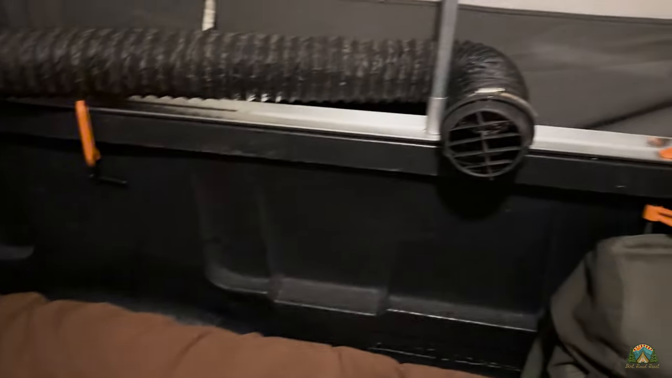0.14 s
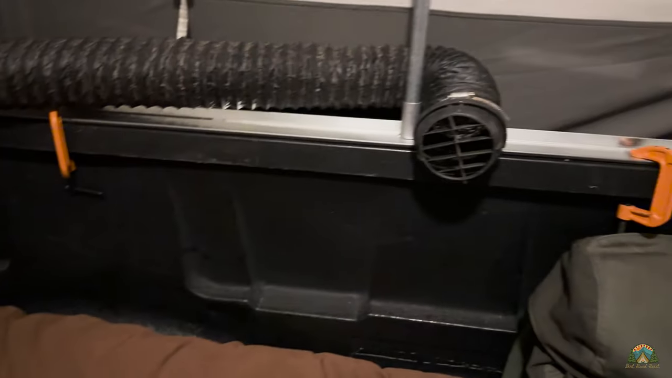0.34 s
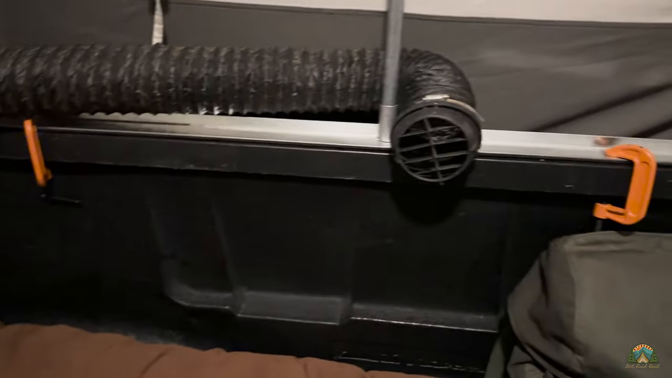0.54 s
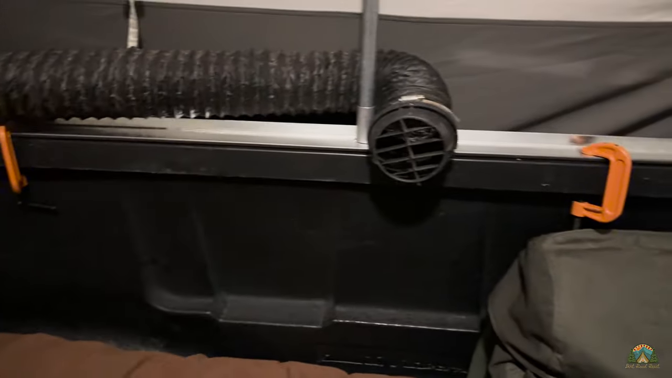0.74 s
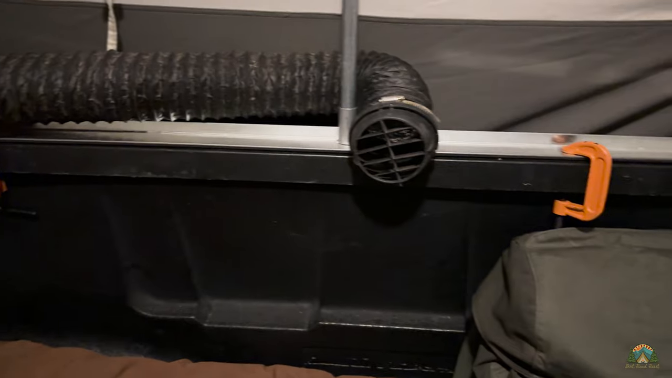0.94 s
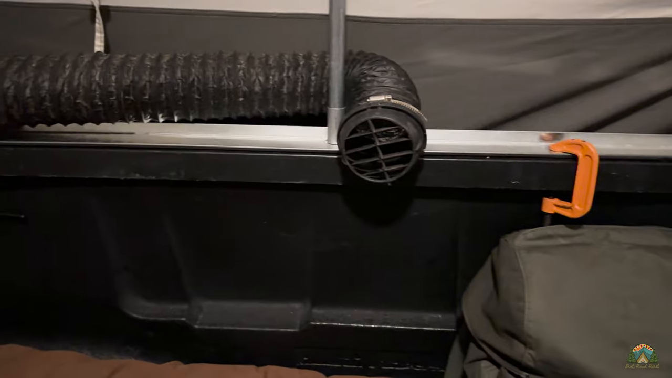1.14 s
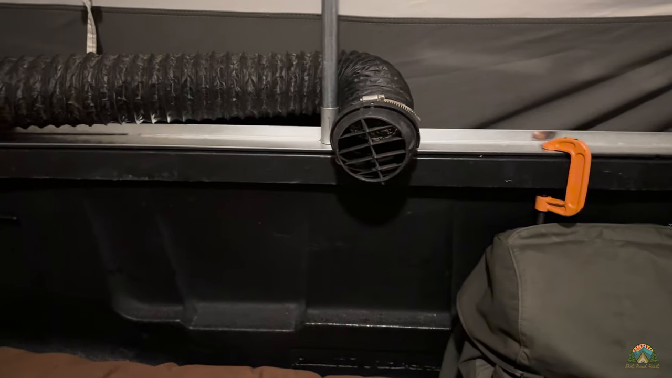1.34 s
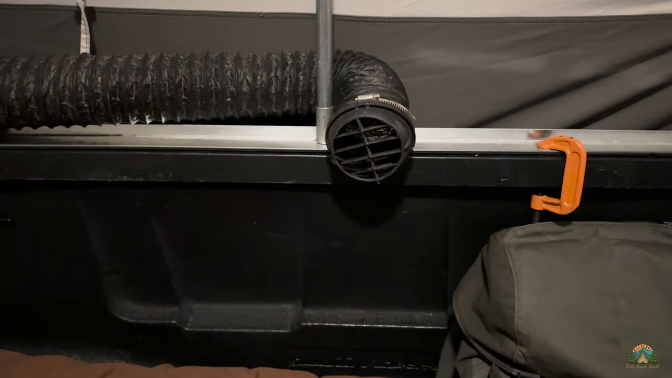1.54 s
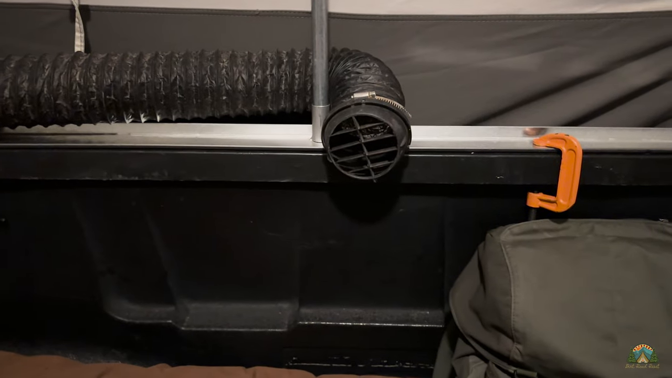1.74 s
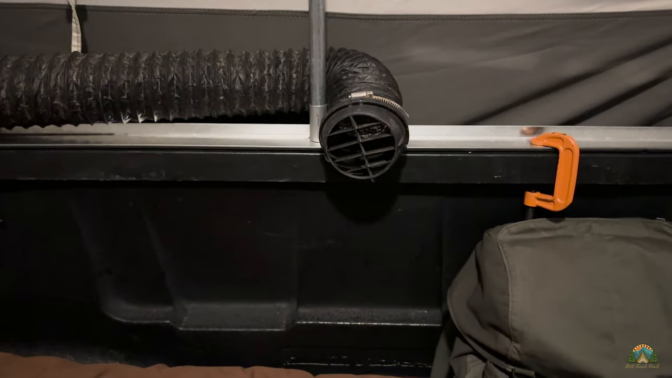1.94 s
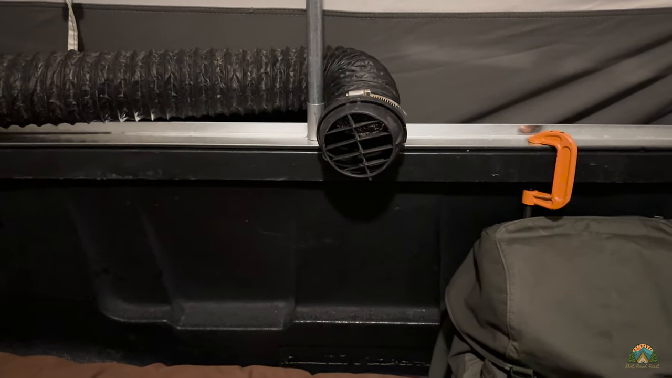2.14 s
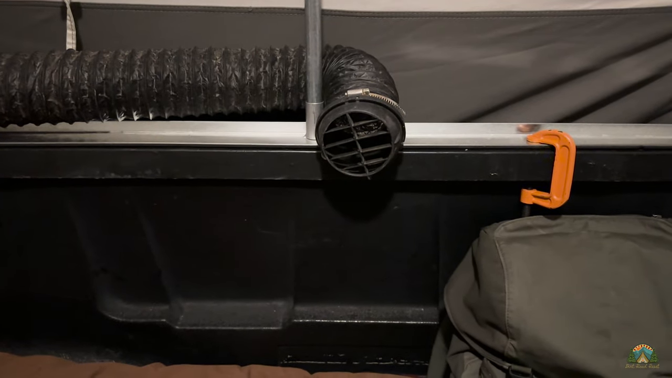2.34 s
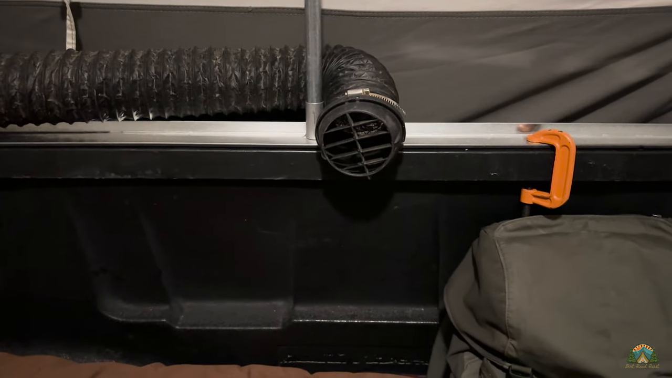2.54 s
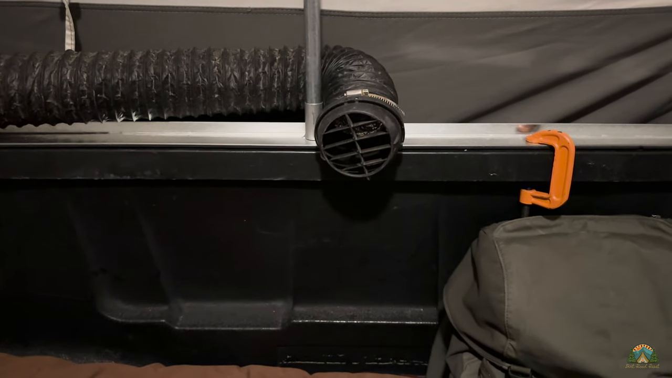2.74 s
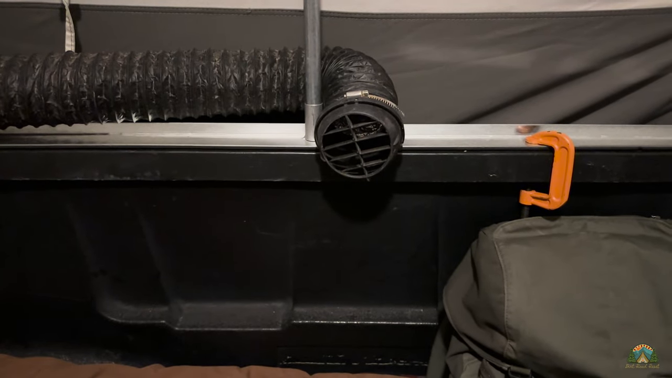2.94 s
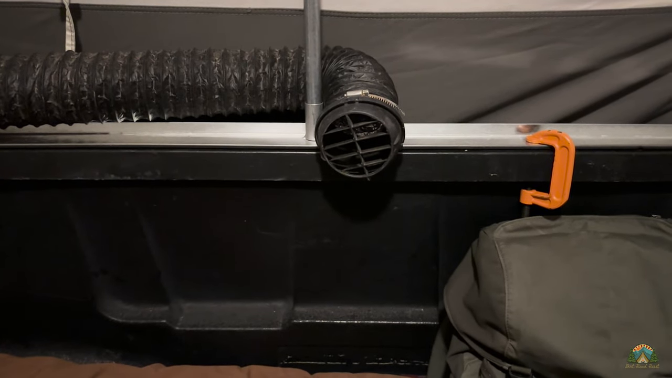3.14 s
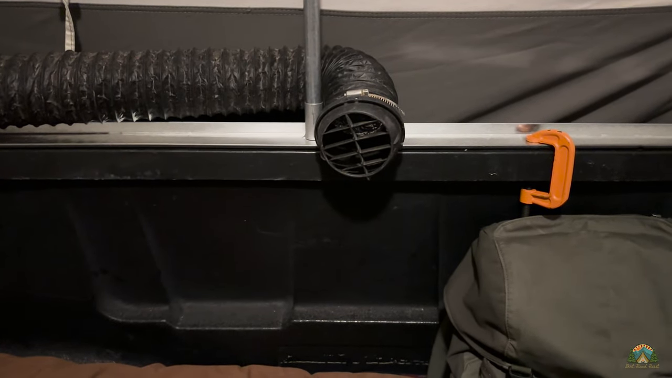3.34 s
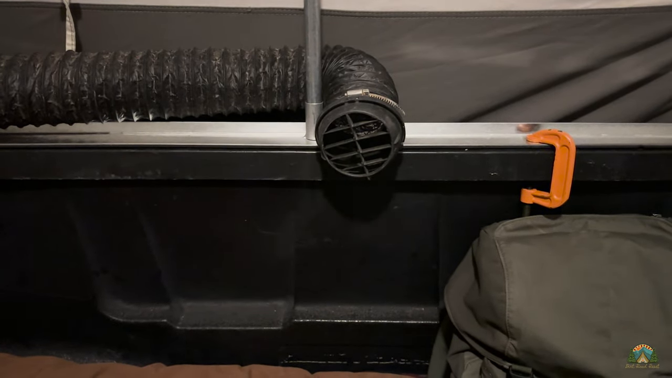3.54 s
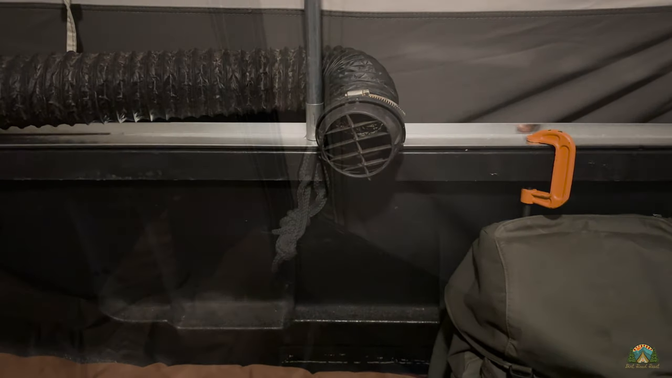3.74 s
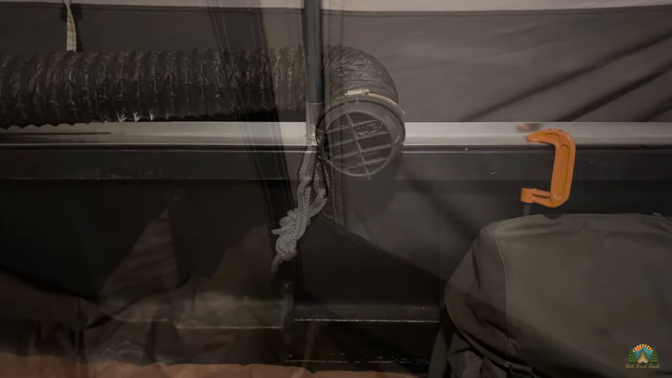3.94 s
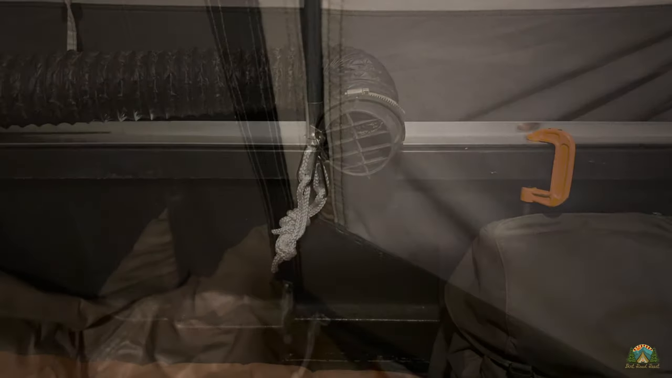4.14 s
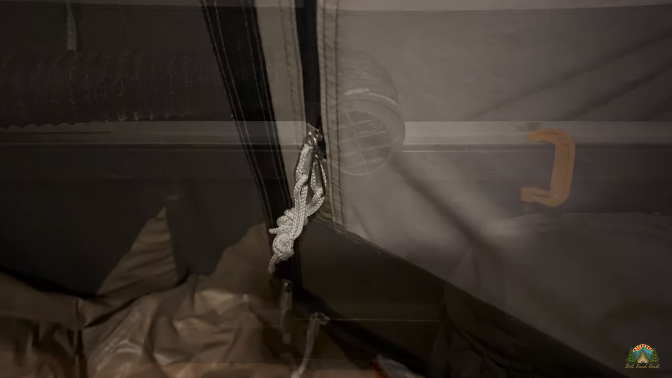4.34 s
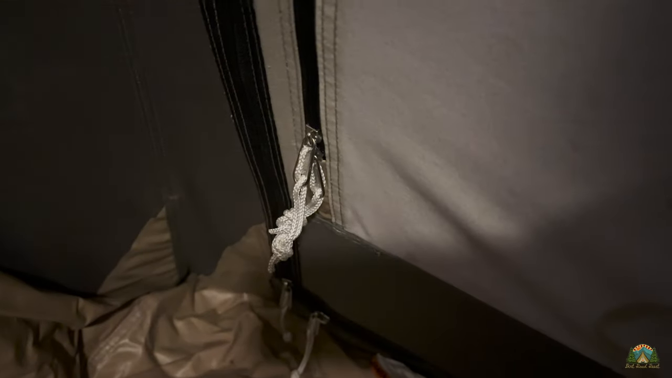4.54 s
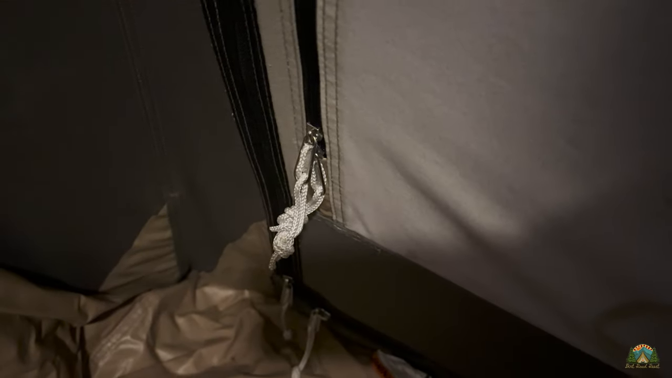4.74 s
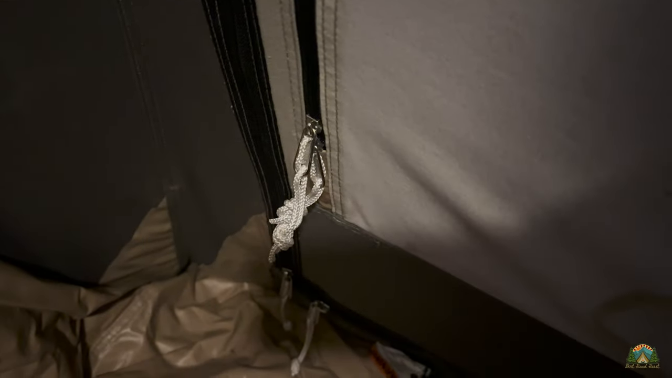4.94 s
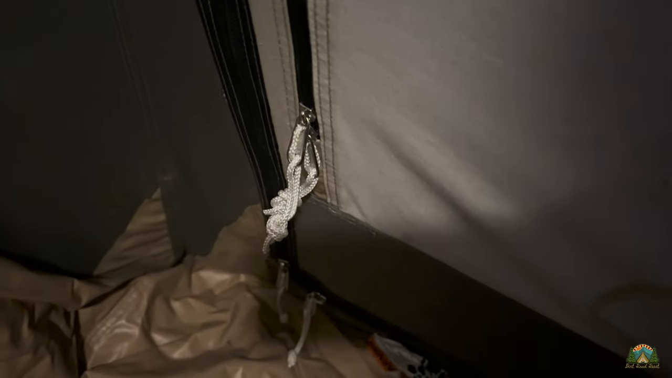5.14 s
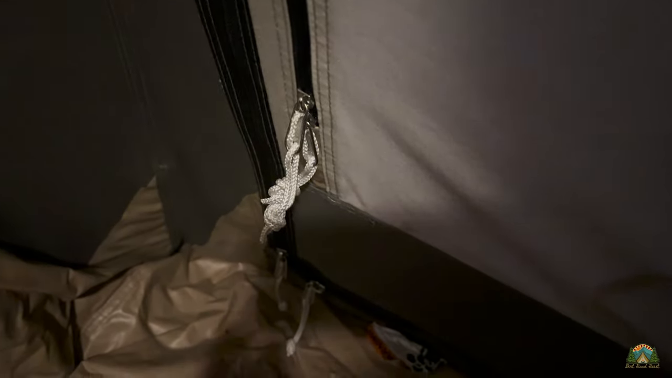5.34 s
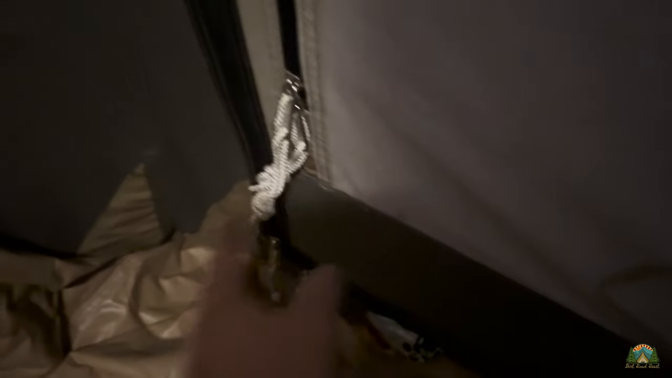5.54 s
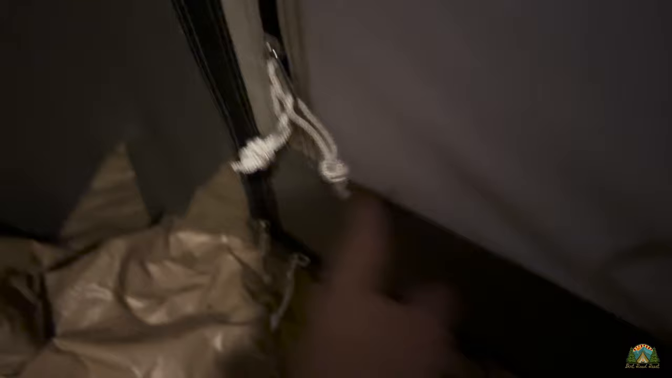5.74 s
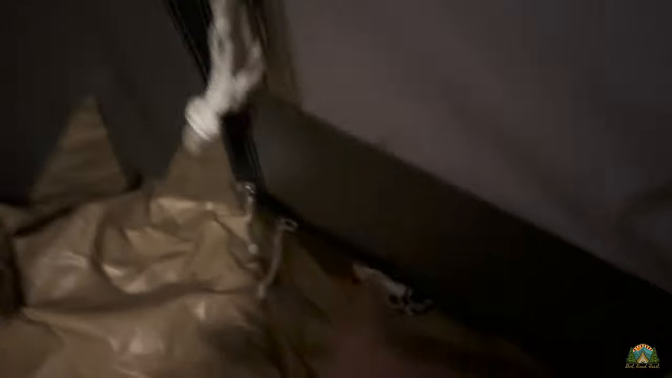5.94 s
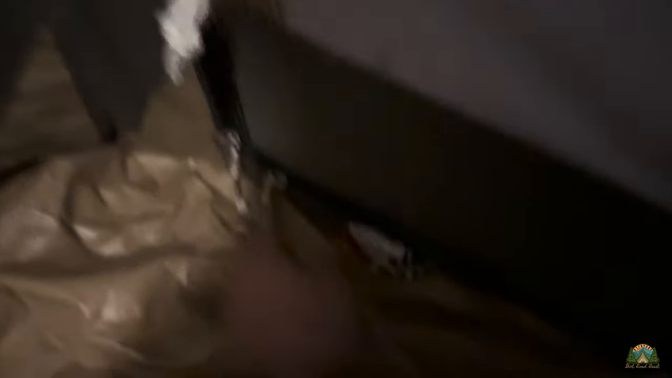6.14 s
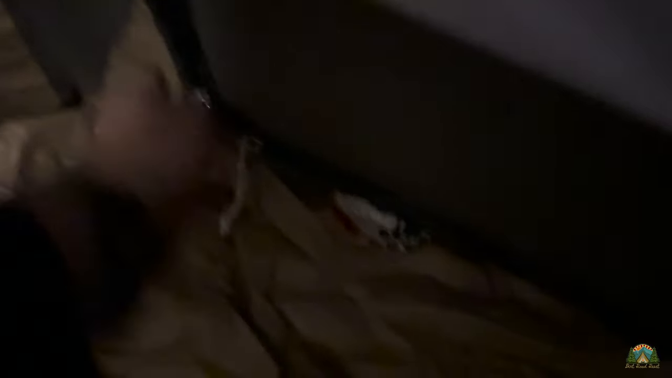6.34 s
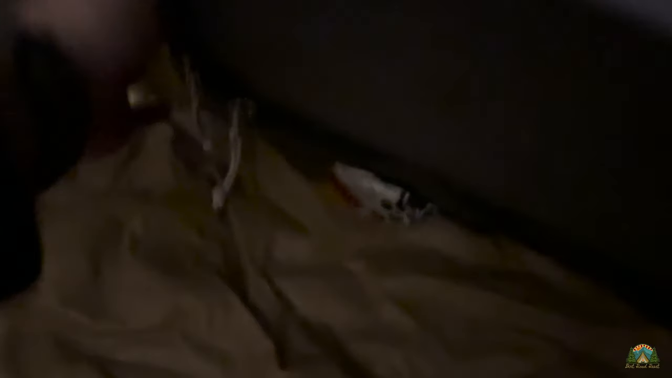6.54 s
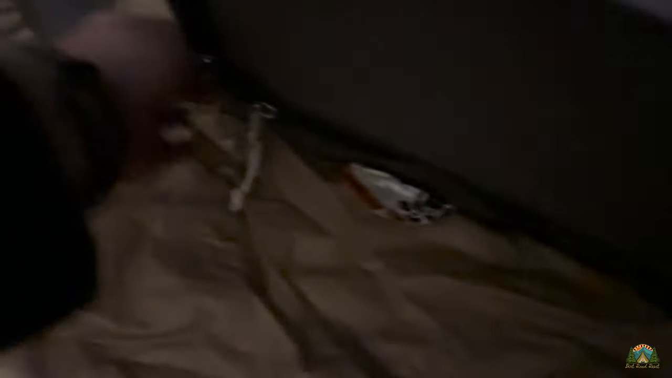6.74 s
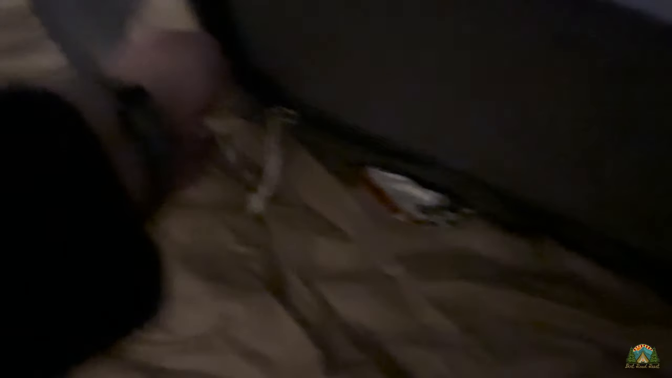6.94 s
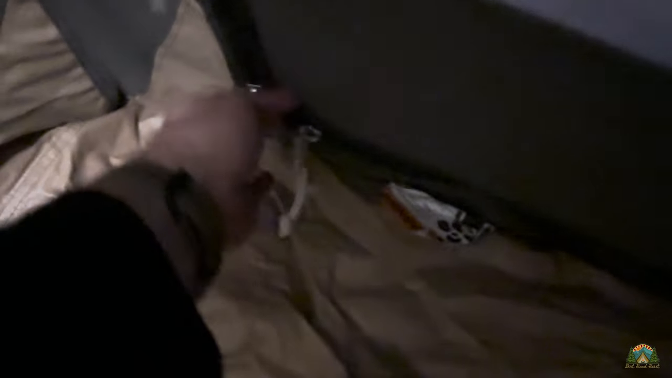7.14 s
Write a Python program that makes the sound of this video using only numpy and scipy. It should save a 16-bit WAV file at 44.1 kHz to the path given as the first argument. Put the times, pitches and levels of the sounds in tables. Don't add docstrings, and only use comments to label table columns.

```python
import sys
import numpy as np
from scipy import signal
from scipy.fft import rfft, irfft, next_fast_len
from scipy.io import wavfile
from scipy.ndimage import map_coordinates

SR = 44100
rng = np.random.default_rng(int(sys.argv[2]) if len(sys.argv) > 2 else 0)


def invert_db(level):
    return 10 ** (np.asarray(level, dtype=float) / 20)


def int16_out(signal):
    q = np.round(np.clip(np.atleast_2d(signal).T, -1, 1) * 32767)
    wavfile.write(sys.argv[1], SR, q.astype(np.int16))


N = 321048
CUT = 4.0641
DIRECT = np.array([[1], [0]])


def unit(x):
    return x / np.sqrt(np.mean(x ** 2) + 1e-20)


def along(points, hz):
    f, v = np.transpose(points)
    return np.interp(np.log(hz + 1), np.log(f + 1), v)


def wobble(rate):
    steps = np.arange(0, N + 32, 32)
    knots = rng.standard_normal(int(N * rate / SR) + 4)
    return np.interp(np.arange(N), steps, map_coordinates(knots, [steps * rate / SR]))


def filtered(x, response):
    m = next_fast_len(x.shape[-1] + 8192)
    return irfft(rfft(x, m) * response(np.fft.rfftfreq(m, 1 / SR)), m)[..., :x.shape[-1]]


def rush(gain, grains=1):
    return unit(filtered(grains * rng.standard_normal((2, N)), gain))


def colour(spectrum):
    return lambda hz: invert_db(along(spectrum, hz))


def swells(t, start, end, db, rise, fall):
    return invert_db(db - rise * np.clip(start - t, 0, None) - fall * np.clip(t - end, 0, None))


def ringing(rows, t60):
    out, t = np.zeros((2, N + SR)), np.arange(SR // 8) / SR
    for s, db, hz in rows:
        pair = np.sin(2 * np.pi * hz * t)
        pair += 0.6 * np.sin(2 * np.pi * 1.03 * hz * t + 6 * rng.random())
        soft_start = (1 - np.exp(-t / 0.00045)) ** 2
        out[0, round(s * SR):][:len(t)] += invert_db(db - 60 * t / t60) * soft_start * pair
    return out[:, :N]


def clicks(rows, life, size, order=1):
    s, db, hz = np.transpose(rows)[..., None]
    k = np.arange(size)
    cycles = k * hz / SR
    shape = (cycles / life * np.exp(1 - cycles / life)) ** order
    note = invert_db(db) * np.sin(2 * np.pi * cycles) * shape
    at = np.round(s * SR).astype(int)
    return np.bincount((at + k).ravel(), note.ravel(), N + size)[:N]


# t/s, left minus right level/dB
HAND = [
    (4.0, -2),
    (5.0, 1),
    (6.2, 1.5),
    (6.75, -1),
    (7.1, 8),
    (7.28, 6),
]


def cracks(events, low_hz, mid_hz, high_hz, slip, tent_db):
    out = np.zeros((2, N + SR))
    t = np.clip(np.arange(-128, 3968), 0, None) / SR
    for s, db, low_db, high_db, t60 in events:
        pan_db = np.interp(s, *np.transpose(HAND))
        fade = invert_db(-60 * np.clip(t - slip, 0, 1) / max(t60, 0.005))
        fade += invert_db(tent_db - 60 * t / 0.16)
        burst = rng.standard_normal((2, len(t))) * fade * (1 - np.exp(-t / 0.00056))
        lumps = 2 * rng.standard_normal(40)
        shape = [(low_hz / 3, low_db + 12), (low_hz, low_db + 5.5), (0.7 * mid_hz, 0),
                 (mid_hz, 0.22 * high_db + 1.5), (high_hz, high_db + 1),
                 (2 * high_hz, high_db - 12.5), (3 * high_hz, high_db - 46)]

        def fold(hz):
            bumpy_db = along(shape, hz) + np.interp(hz, np.arange(40) * 420, lumps)
            return invert_db(bumpy_db) / (1 + (200 / (hz + 1)) ** 4)

        burst = filtered(burst, fold)
        burst[1] += np.clip(pan_db / 12, -0.8, 0.8) * burst[0]
        out[:, round(s * SR) - 128:][:, :len(t)] += invert_db(db) * burst
    return out[:, :N]


# t/s of the peak, build-up/s, level/dB
GRIP = [
    (5.8, 0.079, -45),
    (6.28, 0.12, -37),
    (6.75, .12, -46),
    (7.22, 0.19, -38),
]


def burn():
    t = np.arange(N) / SR
    flame = invert_db(np.where(t < CUT, -43.5, -40) + 1.24 * wobble(4.94))
    let_go_s = 0.049
    grip = sum(swells(t, s, s, db, 10 / build, 10 / let_go_s) ** 2 for s, build, db in GRIP)
    return np.sqrt(flame ** 2 + grip)


def blower(roar, air, duct, air_db, duct_db):
    def pipes(hz):
        return np.sqrt(sum(invert_db(db) ** 2 / (1 + (2 * (hz - centre) / width) ** 4)
                           for centre, width, db in duct))

    whistle = invert_db(duct_db + 2.2 * wobble(6)) * rush(pipes)
    blown = invert_db(air_db + 1.1 * wobble(2.1)) * rush(colour(air))
    return rush(colour(roar)), blown + whistle


# f/Hz, level/dB per Hz
ROAR_1 = [(13, -67.5), (22, -38), (45, -7), (85, -8), (118, 1), (138, -3.5), (162, -12.5), (199, 0.5),
          (238, -13.5), (372, -14.5), (457, -23), (572, -22), (629, -32.5), (1000, -42), (1300, -70),
          (2200, -120)]
ROAR_2 = [(13, -69), (22, -49), (40, -13.5), (75, -3.5), (112, 2), (145, -3.5), (192, 1.5), (261, -5.5),
          (338, -13.5), (436, -14), (503, -17), (554, -31), (600, -24.5), (775, -41.5), (1000, -48.5),
          (1300, -74.5), (2200, -120)]
# f/Hz, level/dB
AIR_1 = [(410, -36), (700, -15.5), (998, -8), (1130, -7), (1750, -16), (2130, -4.5), (2440, -21),
         (4710, -33), (7140, -30.5), (13000, -51.5)]
AIR_2 = [(410, -47), (700, -17.5), (999, -13.5), (1310, -6), (1610, -16.5), (1930, -12.5), (2380, -24.5),
         (2690, -21.5), (3880, -34.5), (10000, -42), (13000, -71), (22000, -120)]
# f/Hz, width/Hz, level/dB
DUCT_1 = [(1083, 9, -5.5), (1194, 27, -7.5), (1299, 53, -8), (1594, 64, -13.5), (1890, 27, -8),
          (2133, 33, -5), (2636, 67, -24.5), (3340, 90, -30)]
DUCT_2 = [(1290, 85, -3), (1680, 30, -20), (1935, 63, -12), (2210, 32, -13), (2584, 82, -22),
          (3304, 50, -26)]


def heater():
    t = np.arange(N) / SR
    roar_1, air_1 = blower(ROAR_1, AIR_1, DUCT_1, air_db=-72.5, duct_db=-71)
    roar_2, air_2 = blower(ROAR_2, AIR_2, DUCT_2, air_db=-67, duct_db=-65)
    near_cut = np.clip(np.abs(t - CUT) / 0.0038, 0, 1)
    roar = burn() * near_cut * np.where(t < CUT, roar_1, roar_2)
    bump = np.cos(np.pi / 2 * np.clip((CUT - 0.001 - t) / 0.0057, -1, 1)) ** 2
    crest = invert_db(-35.5) * (t < CUT) * bump
    crest = filtered(crest, lambda hz: 1 / (1 + (hz / 13000) ** 20))
    blades = invert_db(-70.5 + 0.79 * wobble(8.4)) * np.sin(2 * np.pi * 1120 * t + 3 * wobble(2.7))
    return roar + np.where(t < CUT, air_1, air_2) + (crest + blades) * DIRECT


# t/s, level/dB, f/Hz
TICKS = [(0.0033, -65, 8100), (.079, -64.5, 8500), (.2046, -55, 4100), (1.0942, -45, 1000),
         (.205, -46, 1000), (1.0939, -56, 3700), (6.718, -44, 10600), (6.759, -48, 10500),
         (5.03, -54.5, 5000), (6.36, -37, 5420), (6.757, -42, 5700), (6, -39, 9200), (6.98, -43, 14000),
         (6.6, -44, 6400), (7.197, -41, 1980)]


def ticks():
    return ringing(TICKS, t60=0.021)


# t/s, peak level/dB, f/Hz
RAPS = [(0.2045, -36, 1900), (0.2047, -46, 3900), (0.3438, -43, 1700), (0.344, -47, 800),
        (1.0903, -48, 1500), (1.0938, -38, 2200), (1.094, -46, 3800), (1.0938, -42, 950),
        (1.1904, -34, 2000), (1.191, -42, 800)]
# t/s, peak level/dB, low level/dB, high level/dB
TAPS = [
    (0.2075, -47.5, 5, -32),
    (0.346, -54, 7, -51),
    (1.0967, -47.5, 0.5, -32),
    (1.1933, -47.5, -0.5, -40),
    (5.027, -57, -10, -15),
    (5.2292, -61.5, 9, 1.5),
    (5.33, -47, -4, -35),
]


def frame_taps():
    bodies = cracks([(*row, 0.031) for row in TAPS], low_hz=900, mid_hz=3600, high_hz=6050,
                    slip=0.0011, tent_db=-6.5)
    return bodies + clicks(RAPS, life=0.8, size=256, order=3) * DIRECT


# t/s, peak level/dB, f/Hz
CHIPS = [(0.3345, -71.5, 7730), (0.6619, -71, 7600), (0.7483, -66, 7450), (1.6511, -82, 7800),
         (1.7419, -78, 7600), (2.2403, -89, 7560), (2.3394, -92, 7500), (2.6489, -89, 7650),
         (2.8809, -89, 7030), (3.0904, -79, 7600), (3.5294, -83, 7190), (3.6366, -80, 7430)]


def birds():
    out, t = np.zeros((2, N + SR)), np.arange(SR // 20) / SR
    for s, db, hz in CHIPS:
        puff = rng.standard_normal((2, len(t))) * np.sin(np.pi * np.clip(t / 0.028, 0, 1)) ** 0.6
        note = filtered(puff, lambda f: 1 / (1 + ((f - hz) / 260) ** 4))
        out[:, round(s * SR):][:, :len(t)] += invert_db(db - 13.5) * unit(note)
    return out[:, :N]


PUMP_STARTS = [
    .361,
    4.688,
]
# t/s, peak level/dB, f/Hz
PUMP_EXTRA = [
    (4.082, -51, 618),
    (4.386, -48, 617),
]


def pump_strokes():
    period_s = 0.4341
    times = np.concatenate([s + period_s * np.arange(count) for s, count in zip(PUMP_STARTS, (9, 6))])
    chance = rng.standard_normal((len(times), 2))
    steady = [(s, -45 + 1.2 * a - 3 * (s > CUT), 562.4 + 12 * b) for s, (a, b) in zip(times, chance)]
    return steady + list(PUMP_EXTRA)


def pump():
    out, t = np.zeros((2, N + SR)), np.arange(SR // 4) / SR
    for s, db, hz in pump_strokes():
        ring = invert_db(-60 * t / 0.11) * (1 - np.exp(-t / 0.001)) * np.sin(2 * np.pi * hz * t)
        ring += 0.28 * invert_db(-60 * t / 0.072) * np.sin(2 * np.pi * 1.3 * hz * t)
        out[0, round(s * SR):][:len(t)] += invert_db(db) * ring
        out[0, round((s + 0.04) * SR):][:len(t)] += invert_db(db - 6.5) * ring
    return out[:, :N]


def stroke(t, s, hold, db):
    rise = 460
    rub = swells(t, s, s + hold, db, rise, 290)
    settling = swells(t, s, s + hold, db - 9.5, rise, 83)
    return rub ** 2 + settling ** 2


def fibres(level_db, count):
    when, pitch, size, side = rng.random((count, 4)).T[..., None]
    at = (SR * (4.85 + 2.4 * when)).astype(int)
    hz = 700 * invert_db(20 * pitch)
    k = np.arange(256)
    cycles = k * hz / SR
    level = invert_db(level_db[at] - 5.1 * np.log(size + 0.032))
    grain = level * np.sin(2 * np.pi * cycles) * cycles * np.exp(-cycles / 2.06)
    return np.array([np.bincount((at + k).ravel(), (grain * share).ravel(), N + 256)[:N]
                     for share in (1, 2 * side - 1)])


# t/s, hold/s, level/dB
STROKES = [(4.897, 0.037, -67), (5.127, 0.033, -61), (5.313, 0.081, -61.5), (5.48, 0.22, -59.5),
           (5.755, 0.1, -57.5), (5.928, .24, -54.5), (6.217, 0.19, -60), (6.44, 0.17, -67),
           (6.623, 0.041, -60), (6.895, .09, -65), (7.02, 0.092, -59), (7.162, 0.037, -54),
           (7.265, .02, -72)]
# t/s, level/dB
STRAIN = [
    (4.85, -75.5),
    (5.4, -72.5),
    (6.05, -57.5),
    (6.57, -55.5),
    (6.7, -56.5),
    (6.8, -64),
    (6.96, -68),
    (7.05, -59),
    (7.28, -66),
]
# f/Hz, level/dB
CANVAS = [(1200, -19), (2200, 3.5), (3500, 3), (5000, -1), (6500, 0.5), (8500, -2), (10000, -28),
          (12000, -33)]
TARP = [(7000, -10), (9500, -5.5), (11000, -3.5), (13000, -1.5), (15600, 2), (16000, -5), (16500, -74)]
FOLD = [(250, -23), (500, -2.5), (800, 0), (1400, -1.5), (2200, -11.5), (3500, -24)]


def cloth():
    t = np.arange(N) / SR
    sliding = np.sqrt(sum(stroke(t, *row) for row in STROKES))
    brushing = np.sqrt(sum(stroke(t, s, hold, 0.11 * (db + 52)) for s, hold, db in STROKES))
    strain_db = np.interp(t, *np.transpose(STRAIN))
    canvas_gain = np.hypot(invert_db(strain_db), invert_db(-68) * brushing)
    fold_db = -51.5 + 1.3 * (strain_db - strain_db.max())
    start = np.clip((t - 4.8) / 0.083, 0, 1)
    clumps = 1.3 * wobble(30)
    canvas = invert_db(-1.5) * canvas_gain * rush(colour(CANVAS), invert_db(clumps + 0.7 * wobble(300)))
    tarp = invert_db(-1.5) * sliding * rush(colour(TARP), invert_db(clumps + 1.7 * wobble(540)))
    fold = invert_db(fold_db + 1.5) * rush(colour(FOLD), invert_db(clumps + 2.3 * wobble(60)))
    return start * (canvas + tarp + fold) + fibres(fold_db - 8, count=1200)


# t/s, peak level/dB, f/Hz
POPS = [(5.2015, -40, 1400), (5.2305, -62, 5500), (5.3315, -45.5, 2400), (5.7100, -25, 12500),
        (6.3315, -36, 2700), (6.3544, -31, 2900), (6.3605, -40, 4000), (6.3815, -28, 1500),
        (6.385, -39, 6000), (6.4835, -38, 1200), (6.545, -42.5, 1500), (6.607, -37, 1100),
        (6.698, -32, 5000), (6.7465, -30, 2400), (6.7922, -39, 1200), (7.2212, -24, 13500),
        (7.244, -28, 9000)]


def pops():
    return clicks(POPS, life=0.4, size=256) * DIRECT


# t/s, peak level/dB, low level/dB, high level/dB, 60 dB fade/s
SCRAPES = [(5.6412, -63, 4, -1, .055), (5.7882, -57, 12, -8, .04), (5.8153, -57.5, 14.5, -8, 0.059),
           (5.88, -41, -12, -6.5, 0.16), (5.913, -51, 9, -9, 0.18), (5.9936, -56, -14, 1, .036),
           (6.0688, -38, -12, -12, 0.11), (6.136, -41.5, -7, -14, 0.058), (6.2138, -42.5, -2.5, -15, 0.11),
           (6.327, -49, 8, -29, 0.026), (6.355, -45, -4, -28, .074), (6.3815, -46, 9, -12, 0.016),
           (6.4574, -45.5, -4, -23, .09), (6.5392, -52, 5.5, -32, .081), (6.6492, -62, 11, 14, 0.033),
           (6.979, -47.5, -27, -6, 0.092), (7.0658, -53.5, 13.5, -10, 0.042), (7.1725, -55, 17, -6, .05),
           (7.1926, -48, 6.5, -5, 0.1), (7.2616, -44, -28, -19, .027)]


def scrapes():
    return cracks(SCRAPES, low_hz=1000, mid_hz=6500, high_hz=13100, slip=0.005, tent_db=-39)


# t/s, peak level/dB, low level/dB, high level/dB
SNAPS = [(5.7097, -36.5, -54, 3), (6.33, -53, 6, -30), (6.3582, -40, -2, -16), (6.3862, -46, -8, -10),
         (6.6955, -37.5, -1, -7), (6.7465, -40, -2.5, -33), (6.7819, -51, 5, 6), (6.847, -40, -38, 3),
         (6.878, -43.5, 6.5, 2), (6.8835, -43.5, -1, -25), (7.01, -44, -3, 10.5), (7.043, -49, 0, 1),
         (7.1114, -45.5, 4.5, 3), (7.2208, -33.5, 2.5, -7), (7.2295, -35, -1.5, -1), (7.2418, -35, -29, -3)]


def snaps():
    return cracks([(*row, 0.018) for row in SNAPS], low_hz=1000, mid_hz=6500, high_hz=14800,
                  slip=0.0022, tent_db=-48)


# t/s, peak level/dB, f/Hz
NICKS = [(5.754, -56, 1290), (5.791, -50, 1270), (5.813, -42.5, 710), (5.939, -49, 656), (5.96, -49, 680),
         (6.016, -53, 1260), (6.037, -52, 2350), (6.053, -48, 700), (6.098, -49, 650), (6.12, -45, 800),
         (6.138, -47, 960), (6.163, -42.5, 1280), (6.202, -51, 980), (6.219, -49, 800), (6.266, -48, 3310),
         (6.277, -41, 800), (6.3, -43, 3320), (6.327, -45, 780), (6.3595, -40, 1300), (6.3745, -41, 1100),
         (6.378, -32.5, 1200), (6.3812, -39, 3000), (6.432, -46, 735), (6.438, -46, 2900),
         (6.459, -50, 6200), (6.506, -46.5, 634), (6.538, -43, 900), (6.555, -51, 2830), (6.579, -45, 1340),
         (6.636, -48, 1380), (7.032, -46, 750), (7.065, -38.5, 695), (7.107, -45, 1210),
         (7.173, -42.5, 900), (7.196, -45, 710), (7.218, -44, 2300), (7.226, -39, 790), (7.262, -46, 750),
         (5.7101, -30, 12500), (6.8474, -35, 13500), (6.877, -32, 11300), (6.7475, -40, 1100)]


def nicks():
    return clicks(NICKS, life=1.5, size=1024) * DIRECT


# t/s, level/dB, f/Hz
TWANGS = [
    (5.88, -37.5, 1550),
    (5.881, -44, 3950),
    (5.882, -47, 6500),
    (5.915, -41, 1550),
    (5.916, -49, 4040),
    (6.072, -36.5, 1570),
    (6.746, -44, 950),
]


def twangs():
    return ringing(TWANGS, t60=0.052)


# t/s, level/dB
RATTLE = [(6.697, -42), (6.847, -46), (7.0092, -32.5), (7.0415, -50), (7.045, -37), (7.2198, -24),
          (7.2308, -21), (7.235, -39), (7.2358, -35), (7.2441, -24.5), (7.2443, -30)]
# f/Hz, level/dB
PULL = [(3300, -7), (4500, -7), (5900, -7.5), (7600, -7), (10300, 0), (10800, 3), (13400, -4), (14400, -6),
        (15300, -7)]


def rattle():
    out, t = np.zeros((2, N + SR)), np.arange(SR // 20) / SR
    for s, db in RATTLE:
        modes = sum(invert_db(level + rng.normal(0, 3.1)) * np.sin(2 * np.pi * hz * t + 6 * rng.random())
                    for hz, level in PULL)
        hit = invert_db(db - 60 * t / 0.0084) * (1 - np.exp(-t / 0.0006)) * modes
        out[:, round(s * SR):][:, :len(t)] += hit * [[1], [0.4]]
    return out[:, :N]


# t/s, peak level/dB, f/Hz
KNOCKS = [
    (6.74, -34, 100),
    (6.91, -41, 190),
    (7.034, -36, 126),
    (7.085, -34.5, 120),
    (7.132, -38, 142),
    (7.157, -34.5, 204),
    (7.186, -31.5, 190),
    (7.219, -31.5, 200),
    (7.233, -29, 121),
]


def knocks():
    return clicks(KNOCKS, life=0.7, size=3072)


# t/s, level/dB, f/Hz
THUMPS = [
    (6.742, -44, 45),
    (7.03, -37.5, 50),
    (7.209, -37.5, 50.5),
]


def thumps():
    out, t = np.zeros((2, N + SR)), np.arange(SR // 8) / SR
    for s, db, hz in THUMPS:
        push = np.sin(np.pi * np.clip(t / 0.077, 0, 1)) ** 2
        out[0, round(s * SR):][:len(t)] += invert_db(db) * np.sin(2 * np.pi * hz * t) * push
    return out[:, :N]


# t/s, level/dB, f/Hz
FREE_RING = [
    (7.2598, -40, 5600),
    (7.262, -52, 14500),
]


def free_ring():
    return ringing(FREE_RING, t60=0.15)


# f/Hz, likeness (1 = the same)
ALIKE = [(60, 1), (200, 1), (400, 0.92), (800, 0.44), (1500, 0.068), (3000, 0.45), (7000, 0.26),
         (8700, 0.24), (10500, 0.98), (16000, 0.99)]


def ports(pair, lead):
    def turn(hz):
        return np.arccos(np.clip(along(ALIKE, hz), -1, 1)) / 2

    def half_lead(hz):
        return along(lead, hz) / 2 + np.pi * np.clip(hz - 8000, 0, None) / 6400

    mid, side = filtered(pair, lambda hz: np.array([np.cos(turn(hz)), np.sin(turn(hz))]))
    both = np.array([mid + side, mid - side])
    return filtered(both, lambda hz: np.exp(1j * half_lead(hz) * [[-1], [1]]))


# f/Hz, phase/radians
LEAD_1 = [(40, -.2), (120, -0.76), (350, 0), (1000, -0.99), (1800, 1.2), (2400, -0.42), (3100, -1.2),
          (7200, -1.5), (8000, 0.12)]
LEAD_2 = [(40, 0.97), (120, 0.23), (200, -0.47), (350, -1.23), (1000, -0.63), (1800, 2.5), (3100, -1.5),
          (4500, -1.5), (5900, -1.5), (7200, 1), (8000, 0)]


def scene():
    tent = heater() + ticks() + frame_taps() + birds() + pump()
    fabric = cloth() + pops() + scrapes() + snaps() + nicks() + twangs()
    handling = rattle() + thumps() + free_ring()
    first, second = np.split(tent + fabric + handling, [round((CUT + 0.0014) * SR)], axis=1)
    first = ports(first, LEAD_1) * invert_db([[0.5], [-0.5]])
    second = ports(second, LEAD_2) * invert_db([[0.2], [-0.2]])
    return knocks() + np.hstack([first, second])


def roll_off(x):
    return signal.sosfilt(signal.butter(12, 16980, fs=SR, output="sos"), x)


def record(dry):
    heard = filtered(dry, lambda hz: 1 / (1 + (hz / 16000) ** 80))
    mix = heard + invert_db(-100) * rng.standard_normal(dry.shape)
    return roll_off(mix)


dry = scene()
out = record(dry)
int16_out(out)
```